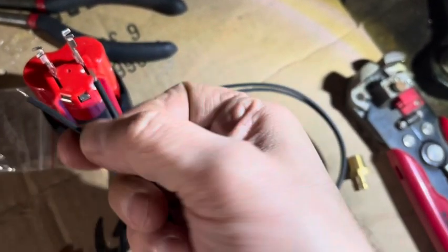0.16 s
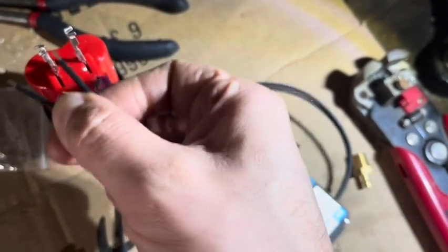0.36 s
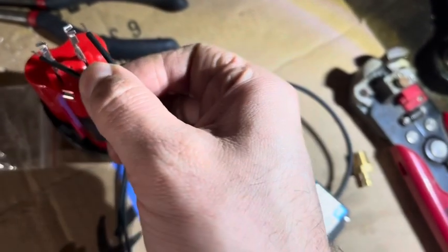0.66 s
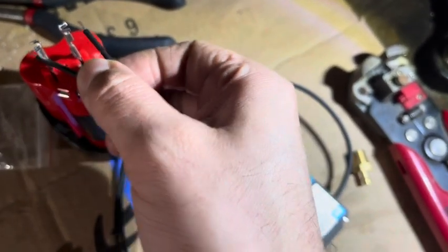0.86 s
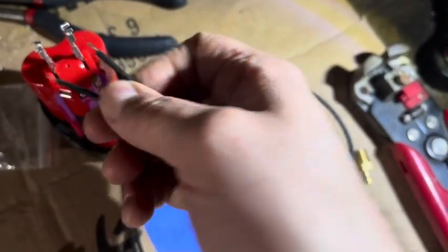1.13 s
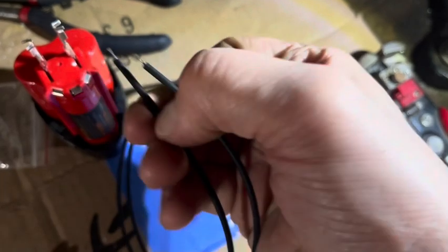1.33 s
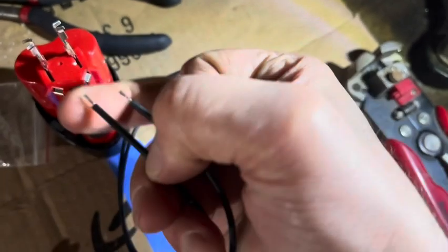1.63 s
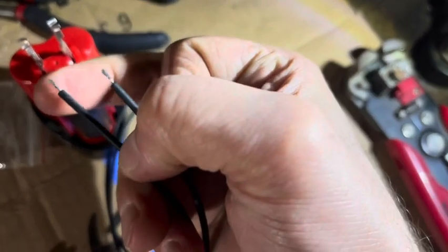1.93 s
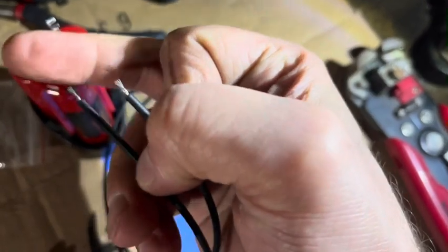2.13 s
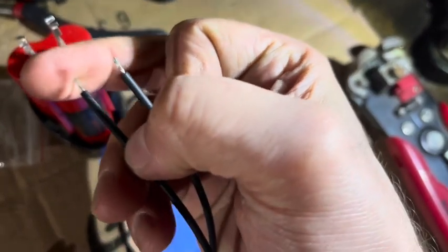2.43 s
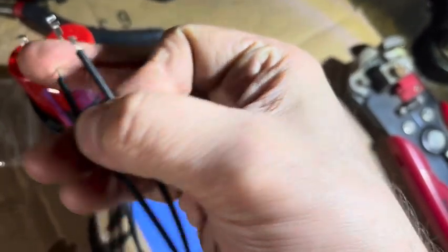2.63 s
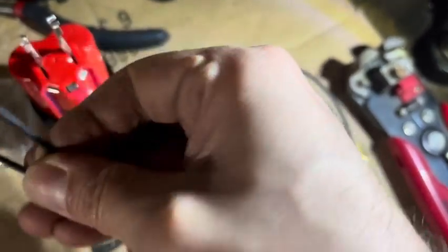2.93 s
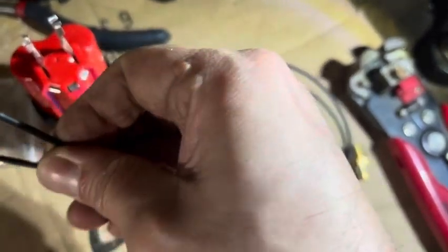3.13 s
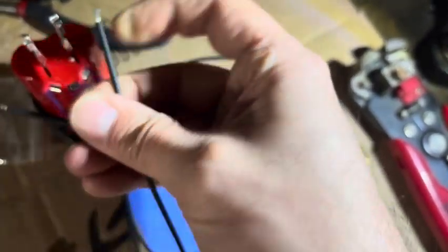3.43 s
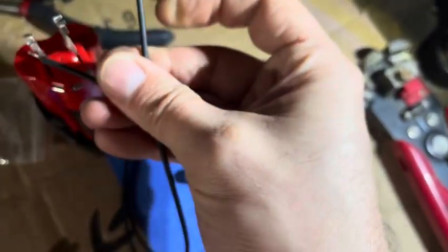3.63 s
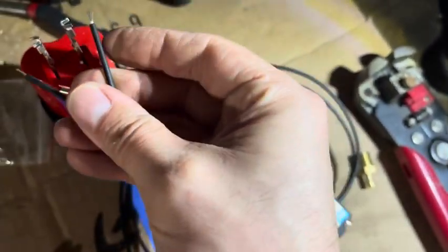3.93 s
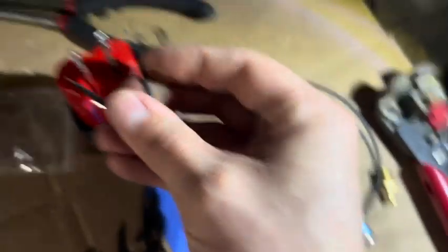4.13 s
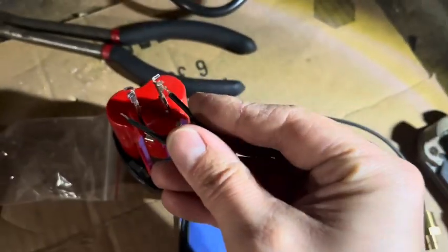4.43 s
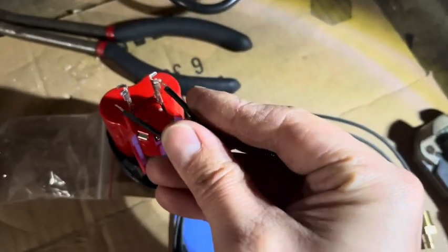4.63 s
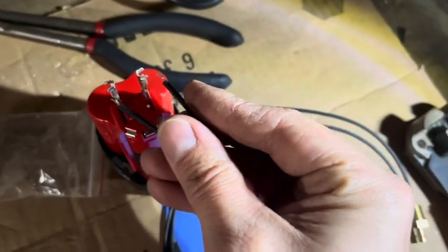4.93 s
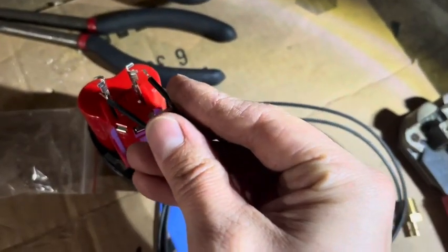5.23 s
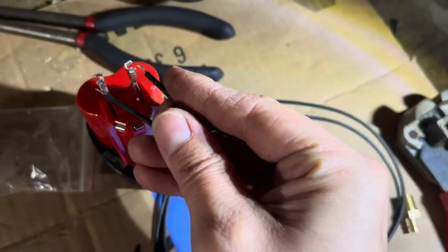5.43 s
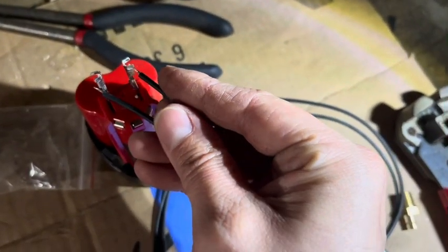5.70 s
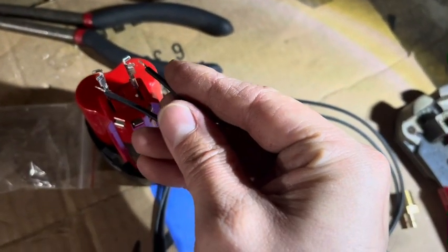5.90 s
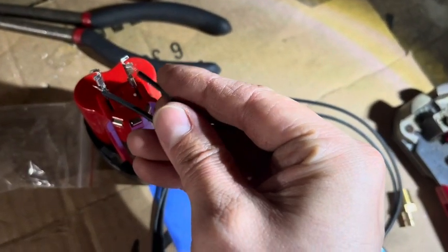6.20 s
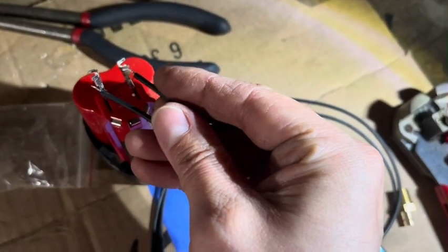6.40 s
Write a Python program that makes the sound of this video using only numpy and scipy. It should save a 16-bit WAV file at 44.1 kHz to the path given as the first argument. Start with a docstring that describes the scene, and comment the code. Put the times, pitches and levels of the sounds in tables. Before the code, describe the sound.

Close up in a small room, with a low wavering drone, dull rumble and faint hiss, fingers handle two stiff wires at a battery on a cardboard-covered bench. Hollow knocks, dry rubs, tiny flicks and a few thin metallic tinks come irregularly. After a quieter pause, a small solenoid valve clicks nine times, sharp and bright, the last seven close together, each with a short rattling wash.

```python
"""A low, wavering drone, a dull rumble and faint hiss fill a small room throughout.
First a hand works two stiff wires onto a battery's spade terminals over a cardboard-covered bench:
rubs and squeaks made of tiny slips, and knocks, flicks and tinks made of noise bursts, some with ringing.
Then the wires make and break contact and a small solenoid valve clicks nine times.
Each click is a cluster of plunger strokes that ring the valve, followed by a short rattling wash."""
import sys
import numpy as np
from scipy import signal
from scipy.fft import rfft, irfft
from scipy.io import wavfile
from scipy.ndimage import uniform_filter1d

SR = 44100
rng = np.random.default_rng(int(sys.argv[2]) if len(sys.argv) > 2 else 0)


def wrap_up_sound(samples):
    """Save the sound to the file named by the first command line argument, as 16-bit audio."""
    columns = np.atleast_2d(samples).T
    # keep every value between -1 and 1, then stretch to whole-number steps
    tamed = np.clip(columns, -1, 1)
    steps = np.round(tamed * 32767).astype(np.int16)
    wavfile.write(sys.argv[1], SR, steps)


N = 289296

# low drone: (time [s], level [dB])
DRONE_LEVEL = [(0.0, -36), (0.07, -56.5), (0.29, -41), (0.47, -39), (0.66, -68), (0.71, -47.5), (1.71, -54),
               (1.9, -42.5), (1.97, -53), (4.04, -58.5), (4.84, -50.5), (5.59, -63.5), (5.66, -52.5),
               (6.56, -51.5)]
# tone colour of the rumble, the hiss and the room's reflections: (frequency [Hz], level [dB])
RUMBLE_COLOUR = [(25, -22.5), (48, 1.5), (80, 2), (240, -12.5), (450, -27.5)]
AIR_COLOUR = [(250, -3.5), (1000, -15.5), (2900, -32), (3800, -27), (9300, -26.5), (12000, -31.5),
              (14000, -54)]
ROOM_COLOUR = [(200, 18), (1200, -0.5), (6000, 0), (9000, -0.5), (16000, -22)]

# rustle of the fingers: (time [s], level [dB])
RUSTLE_LEVEL = [(0.2, -75.5), (0.95, -75), (1.7, -85), (2.55, -84.5), (2.8, -77.5), (3.25, -87.5),
                (4.4, -77.5), (5.0, -87.5)]
# tone colour of fingers and wires shifting: (frequency [Hz], level [dB])
FIDGET_COLOUR = [(700, -2), (1500, 4), (2800, 5.5), (3800, -8.5), (9500, -5), (12500, -25.5)]
# wires dragging over cardboard and fingers:
# (start [s], end [s], scrape [dB], hiss [dB, plays 10 dB lower], favoured band [Hz])
RUBS = [(0, 0.112, -64, -59, 1520), (0.277, 0.358, -57.5, -60, 1410), (0.355, 0.367, -44, -61.5, 1200),
        (0.376, 0.443, -58, -51, 1400), (1.06, 1.135, -59.5, -63, 714), (1.108, 1.163, -48.5, -49.5, 1580),
        (1.161, 1.211, -48.5, -50.5, 1450), (1.489, 1.578, -76, -66, 2840), (2.861, 2.9, -62, -75, 1310),
        (2.977, 3.083, -71.5, -66, 2300), (3.38, 3.408, -66, -49, 2030), (3.487, 3.533, -56.5, -59.5, 1410),
        (3.613, 3.813, -67.5, -72.5, 1390)]
# tone colour of a scrape: (frequency [Hz], level [dB])
SCRAPE_COLOUR = [(250, -22.5), (480, 1), (700, -3.5), (1400, -1.5), (2200, -2.5), (3000, -2.5), (4500, -15)]
# fingers squeaking on insulation: (start [s], end [s], level [dB], first pitch [Hz], last pitch [Hz])
SQUEAKS = [(2.067, 2.174, -68.5, 2236, 1656), (2.403, 2.458, -76, 1724, 1830)]
# ringing pitches under a squeak: (frequency [Hz], level [dB])
SQUEAK_MODES = [(1850, 2.5), (2890, -1)]
# stiff wire flicking against fingers and terminals: (time [s], level [dB])
FLICKS = [(0.244, -63), (0.41, -51), (0.471, -62.5), (0.635, -61.5), (0.737, -65), (0.985, -59),
          (2.64, -62.5), (3.031, -57), (3.812, -54), (4.097, -68), (4.107, -63.5), (4.37, -67)]

# bare wire touching a spade terminal: (time [s], level [dB])
TINKS = [(0.843, -56.5), (3.825, -47.5), (4.261, -65), (4.684, -54.5)]
# wire strands scratching along a terminal:
# (start [s], end [s], level [dB], terminal's ring over the scratch [dB], favoured band [Hz])
SCRATCHES = [(0.753, 0.91, -73, 11, 8660), (4.502, 4.547, -58, 2.5, 6460), (4.6, 4.634, -55, 5, 4230),
             (4.769, 4.832, -74.5, 3.5, 8650), (5.193, 5.226, -70.5, -2, 8750)]
# ringing pitches of a terminal: (frequency [Hz], level [dB])
SPADE_MODES = [(3000, 12), (4215, 3), (4330, 0), (5860, -6.5), (8670, -0.5), (8850, 9.5), (9450, -1),
               (11050, -3)]
# wires and battery knocking on the bench:
# (time [s], thud [dB], rap [dB], tick [dB], bounce size [0-1])
KNOCKS = [(0.29, -54, -44, -47.5, 0.2), (0.3721, -40, -30.5, -41, 0.4), (0.549, -59.5, -51, -64.5, 0),
          (1.065, -60.5, -57.5, -96, 0.2), (1.168, -51, -52.5, -63.5, 0.4), (2.674, -50.5, -48, -64, 0.66),
          (2.963, -55.5, -53, -61, 0.43), (2.977, -53, -54, -72, 0.05), (3.677, -65, -48, -82, 0.26),
          (3.801, -57, -55.5, -64, 0), (3.821, -79, -62.5, -43, 0), (4.129, -41, -56, -56.5, 0.06),
          (4.157, -53.5, -56, -50.5, 0), (4.26, -65.5, -48, -44, 0.13), (4.856, -63.5, -59, -71, 0.27),
          (5.244, -68.5, -54, -56.5, 0.14)]
# ringing pitches of the cardboard and battery case: (frequency [Hz], level [dB])
THUD_MODES = [(510, 2.5), (640, -0.5), (745, -1)]
RAP_MODES = [(1215, 2.7), (1465, 6), (2030, 1)]
# tone colour of the three parts of a knock: (frequency [Hz], level [dB])
THUD_COLOUR = [(180, -30.5), (400, -12), (650, 6.5), (900, 7.5), (1300, -4)]
RAP_COLOUR = [(700, -14.5), (1200, 1), (2200, -5), (3300, -9.5), (5000, -26)]
TICK_COLOUR = [(2100, -1.5), (7000, 3.5), (9500, 5.5), (11500, -6.5), (12500, -15.5), (14000, -32.5)]

# tone colour of the wash after a click: (frequency [Hz], level [dB])
RATTLE_COLOUR = [(500, -1), (2500, 0), (9500, 1), (13000, -17)]
# valve clicks: (time [s], plunger travel [s], lift-off ring [dB], lift-off clack [dB],
# end-stop clack [dB], rebound size [0-1])
CLICKS = [(5.6375, 0.0048, -45, -44.5, -37.5, 0.8), (5.81, 0.004, -37, -37, -34, 0.2),
          (6.061, 0.002, -31, -43, -45.5, 0.85), (6.113, 0.0039, -41, -42, -34, 0.01),
          (6.2023, 0.003, -31, -44.5, -36, 0.58), (6.2911, 0.0036, -25.5, -39, -35.5, 0.03),
          (6.3763, 0.0038, -36, -45.5, -34, 0.74), (6.4648, 0.004, -43.5, -37.5, -34, 0),
          (6.5444, 0.0035, -32, -45, -32, 0.6)]
# faint ticks between the clicks: (time [s], clack [dB])
SETTLES = [(5.673, -58), (5.745, -68.5), (6.091, -56.5)]
# ringing pitches of the valve body and its steel core: (frequency [Hz], level [dB])
BODY_MODES = [(940, -6), (1470, 1), (2030, -5.5), (3300, 0), (5150, 4), (5850, 11.5), (7490, 10)]
METAL_MODES = [(8600, -2), (9010, -5), (9550, -1), (10250, -3), (10850, 11), (11800, 7.5)]
# tone colour of the body's contact and the core's contact: (frequency [Hz], level [dB])
CLACK_COLOUR = [(150, 0), (350, -10), (700, -8.5), (1400, -2.5), (3000, 1.5), (7400, -0.5), (8600, -11.5)]
SNAP_COLOUR = [(6400, -20.5), (7300, -5.5), (8700, 0.5), (9600, 6), (10250, -3), (10900, -2.5),
               (11800, -16), (13000, -20), (16500, -30)]

TIME = np.arange(N) / SR  # seconds
HIT_TIME = TIME[:8192]
DRONE_HZ, AIR_DB = 59.7, -77
RUMBLE_DB, RUMBLE_SWING_DB = -58.5, 3
SLIPS_PER_S = 3000  # average number of tiny slips each second
CLUMP_DB, GRAIN_DB = 3, 3.0  # unevenness of the clumps and of the single grains in a drag
DRAG_SKEW = 0.66  # below 1 moves the strongest pressure ahead of the middle of a drag
FOCUS_DB = 4.5  # fall per octave away from a favoured band, over two octaves
SPADE_T60_S, BOUNCE_S = 0.044, 0.011
THUD_HZ, THUD_DB_PER_OCTAVE = 900, 25.5  # band of a thud at -30 dB; softer bumps sound lower
CRACK_SLOPE, CRACK_DB = 1.528, 17.5  # the first crack of a knock grows faster than its rap
RATTLE_DB, RATTLE_T60_S = -14, 0.27  # level relative to the end-stop clack
LIFT_SHARE = 0.55  # length of the lift-off snap relative to a full blow
STOP_RING_DB, RING_LAG_S = 5, 0.00037  # core's ring over the end-stop clack; delay of a full blow's ring
REBOUND_S, REBOUND_RING_DB, REBOUND_CLACK_DB = 0.0077, -41.5, -37  # levels at rebound size 1
TOP_HZ = 16400


def undb(db):
    """Turn decibels into a multiplier."""
    return 10 ** (np.asarray(db) / 20)


def unit(x):
    """Scale to an average (rms) strength of 1."""
    return x / np.sqrt(np.mean(x ** 2))


def blow(x):
    """Scale a hit to the energy of 10 ms at rms 1."""
    return x * np.sqrt(SR / 100 / np.sum(x ** 2))


def held(x, length_s):
    """Scale a sound to the energy of rms 1 lasting length_s."""
    return x * np.sqrt(length_s * SR / np.sum(x ** 2))


def fade(t, t60):
    """Die away smoothly, 60 dB down after t60 seconds."""
    return np.exp(-np.log(1000) * t / t60)


def add(track, s, sound):
    """Mix a sound into a track at time s."""
    start = max(int(s * SR), 0)
    track[start:start + len(sound)] += sound[:N - start]


def wander(size):
    """Random drift of rms 1, smoothed over size samples and again over half of that."""
    smooth = uniform_filter1d(rng.standard_normal(N), size)
    return unit(uniform_filter1d(smooth, size // 2))


def colour(x, points):
    """Shape the tone through (Hz, dB) points with a filter that never sounds ahead of its input."""
    size = x.shape[-1]
    hz, db = np.transpose(points)
    bins = np.maximum(np.arange(size // 2 + 1) * SR / size, 1)
    # outside the points the level falls steeply for two octaves, then stays low
    beyond = np.abs(np.log2(bins / np.clip(bins, hz[0], hz[-1])))
    gain_db = np.interp(np.log(bins), np.log(hz), db) - 38.9 * np.minimum(beyond, 2)
    # folding the cepstrum (the spectrum of the log gain) forward in time fixes the phase
    cepstrum = irfft(np.log(undb(gain_db)), size)
    cepstrum[1:size // 2] *= 2
    cepstrum[size // 2 + 1:] = 0
    return irfft(rfft(x) * np.exp(rfft(cepstrum)), size)


def favour(x, centre_hz):
    """Stress one broad band, with less for each octave away from it."""
    octaves = np.arange(-2, 3)
    return colour(x, np.transpose([centre_hz * 2. ** octaves, -FOCUS_DB * np.abs(octaves)]))


def ring(modes, t60, detune):
    """An object's fading tones; each blow varies their pitch and balance, as if hitting another spot."""
    hz, db = np.transpose(modes)[:, :, None]
    pitch, size, phase = rng.standard_normal((3, len(modes), 1))
    waves = np.sin(2 * np.pi * (hz * (1 + detune * pitch) * HIT_TIME + phase))
    mix = np.sum(undb(db + 1.9 * size) * waves, axis=0)
    return blow(mix * fade(HIT_TIME, t60))


def excite(x, modes, t60):
    """The ringing of an object driven by x, at rms 1."""
    return unit(signal.fftconvolve(x, ring(modes, t60, detune=0.0039))[:len(x)])


def strike(spectrum, contact_t60, rise_s, modes=None, ring_t60=0, ring_db=0, detune=0.0039):
    """A brief rough contact and, if modes are given, the ringing that it leaves."""
    noise = rng.standard_normal(len(HIT_TIME)) * fade(HIT_TIME, contact_t60)
    crack = blow(colour(noise, spectrum))
    tone = undb(ring_db) * ring(modes, ring_t60, detune) if modes else 0
    onset = 1 - np.exp(-(HIT_TIME / rise_s) ** 2)
    return blow((crack + tone) * onset)


def swell(track, s, db, spectrum, length_s):
    """A soft noise that swells up to time s, then dies down."""
    shape = np.exp(-((HIT_TIME - length_s) / (length_s / 2)) ** 2)
    noise = rng.standard_normal(len(HIT_TIME)) * shape
    add(track, s - length_s, undb(db) * blow(colour(noise, spectrum)))


def drag(length_s, slips_per_s=SLIPS_PER_S):
    """Stick and slip: fine uneven grains that come in clumps under an arch of pressure."""
    t = TIME[:20000]
    progress = np.clip(t / length_s, 0, 1)
    arch = np.sqrt(np.sin(np.pi * progress ** DRAG_SKEW).clip(0))
    clumps = unit(uniform_filter1d(rng.standard_normal(len(t)), size=400))
    sizes = undb(CLUMP_DB * clumps + GRAIN_DB * rng.exponential(size=len(t)).clip(0, 4))
    slips = rng.random(len(t)) < slips_per_s / SR
    return arch * sizes * slips * np.sign(rng.standard_normal(len(t)))


def place(x, left_db, lag_s):
    """Two microphone ports: the left one hears the sound louder by left_db and later by lag_s."""
    hz = np.arange(N // 2 + 1) * SR / N
    late = irfft(rfft(x) * np.exp(-2j * np.pi * hz * lag_s), N)
    gain = undb(left_db)
    return np.array([gain * late, x]) * np.sqrt(2 / (1 + gain ** 2))


def room(x, wet_db, t60, build_s):
    """Dense reflections from bench and walls: fading noise, different at each port."""
    t = TIME[:20000]
    noise = colour(rng.standard_normal((2, len(t))), ROOM_COLOUR)
    tail = noise * fade(t, t60) * (1 - np.exp(-t / build_s))
    tail /= np.sqrt(np.sum(tail ** 2, axis=1, keepdims=True))
    return x + undb(wet_db) * signal.fftconvolve(x, tail, axes=1)[:, :N]


def wide_noise(spectrum, side_db):
    """Coloured noise shared by both ports, plus a part that pushes them in opposite directions."""
    mid, side = unit(colour(rng.standard_normal((2, N)), spectrum))
    return mid + undb(side_db) * np.array([side, -side])


def background():
    """A low tone of wavering pitch and level, uneven handling rumble (low noise) and faint even hiss."""
    turns = np.cumsum(DRONE_HZ + 0.9 * wander(size=5000)) / SR
    drone_db = np.interp(TIME, *np.transpose(DRONE_LEVEL))
    drone = np.sqrt(2) * undb(drone_db) * np.sin(2 * np.pi * turns)  # a sine's peak is root 2 over its rms
    rumble_db = RUMBLE_DB + RUMBLE_SWING_DB * wander(size=3500)
    rumble = undb(rumble_db) * wide_noise(RUMBLE_COLOUR, side_db=-12.0)
    air = undb(AIR_DB) * wide_noise(AIR_COLOUR, side_db=-1.5)
    return place(drone, left_db=1.5, lag_s=0) + rumble + air


def fidget():
    """Fingers shift on the wire insulation: tiny slips make a soft rustle in irregular spurts."""
    spurts_db = 6.0 * np.tanh(wander(size=1800))
    grip_db = spurts_db + np.interp(TIME, *np.transpose(RUSTLE_LEVEL))
    grains = (rng.random(N) < SLIPS_PER_S / SR) * rng.standard_normal(N)
    return place(undb(grip_db) * unit(colour(grains, FIDGET_COLOUR)), left_db=6.5, lag_s=0)


def rubs():
    """Each drag rings the cardboard in the band that the grip favours, with a little dry hiss."""
    scrape, hiss = np.zeros((2, N))
    for start, end, scrape_db, hiss_db, centre_hz in RUBS:
        length_s = end - start
        grains = drag(length_s)
        ringing = excite(grains, THUD_MODES + RAP_MODES, t60=0.021)
        body = unit(colour(grains, SCRAPE_COLOUR)) + undb(-3) * ringing
        add(scrape, start, undb(scrape_db) * held(favour(body, centre_hz), length_s))
        dry_hiss = colour(drag(length_s), TICK_COLOUR)
        add(hiss, start, undb(hiss_db - 10) * held(dry_hiss, length_s))
    return place(scrape, left_db=6.5, lag_s=-0.000097) + place(hiss, left_db=3.5, lag_s=0)


def squeaks():
    """Skin judders over wire insulation: a rough gliding chirp over a resonant rasp."""
    out = np.zeros(N)
    for start, end, db, from_hz, to_hz in SQUEAKS:
        length_s = end - start
        rasp = excite(drag(length_s), SQUEAK_MODES, t60=0.031)
        progress = np.clip(TIME[:len(rasp)] / length_s, 0, 1)
        judder = 1 + 0.083 * wander(size=30)[:len(rasp)]
        hz = (from_hz + (to_hz - from_hz) * progress) * judder
        chirp = np.sin(np.pi * progress) * np.sin(2 * np.pi * np.cumsum(hz) / SR)
        add(out, start, undb(db) * held(unit(chirp) + rasp / 2, length_s))
    return place(out, left_db=6.0, lag_s=0)


def flicks():
    """A bent wire slips free with a small dry snap, a short burst of noise."""
    out = np.zeros(N)
    for s, db in FLICKS:
        add(out, s, undb(db) * strike(FIDGET_COLOUR, contact_t60=0.029, rise_s=0.00064))
    return place(out, left_db=7.0, lag_s=0)


def terminals():
    """A wire end taps a thin spade terminal or scratches along it, and sets it ringing."""
    out = np.zeros(N)
    for s, db in TINKS:
        tink = strike(TICK_COLOUR, contact_t60=0.029, rise_s=0.00015,
                      modes=SPADE_MODES, ring_t60=SPADE_T60_S, ring_db=-3.5)
        add(out, s, undb(db) * tink)
    for start, end, db, ring_db, centre_hz in SCRATCHES:
        grains = drag(end - start, slips_per_s=1100)
        scratch = unit(unit(colour(grains, TICK_COLOUR)) + unit(colour(grains, FIDGET_COLOUR)))
        metal = scratch + undb(ring_db) * excite(grains, SPADE_MODES, SPADE_T60_S)
        add(out, start, undb(db) * held(favour(metal, centre_hz), end - start))
    return place(out, left_db=5.5, lag_s=0)


def knocks():
    """Wires and battery bump the cardboard: soft noise swells into a crack, hollow thud, rap and tick."""
    wood, ticks = np.zeros((2, N))
    for s, thud_db, rap_db, tick_db, bounce in KNOCKS:
        swell(wood, s, rap_db - 9.5, RAP_COLOUR, length_s=0.012)
        impulse = 1. * (HIT_TIME == 0)
        add(wood, s, undb(CRACK_SLOPE * rap_db + CRACK_DB) * blow(colour(impulse, RAP_COLOUR)))
        swell(ticks, s, tick_db - 19.5, TICK_COLOUR, length_s=0.029)
        thud_hz = THUD_HZ * 2 ** ((thud_db + 30) / THUD_DB_PER_OCTAVE)
        # a bounce of size 0 is silent
        for at, size in [(s, 1), (s + BOUNCE_S, bounce)]:
            thud = strike(THUD_COLOUR, contact_t60=0.025, rise_s=0.0009,
                          modes=THUD_MODES, ring_t60=0.024, ring_db=1.5)
            rap = strike(RAP_COLOUR, contact_t60=0.027, rise_s=0.00031,
                         modes=RAP_MODES, ring_t60=0.035, ring_db=0.5)
            tick = strike(TICK_COLOUR, contact_t60=0.027, rise_s=0.00046)
            add(wood, at, size * undb(thud_db) * blow(favour(thud, thud_hz)))
            add(wood, at, size * undb(rap_db) * rap)
            add(ticks, at, size * undb(tick_db) * tick)
    return place(wood, left_db=6.5, lag_s=-0.000058) + place(ticks, left_db=5.0, lag_s=0)


def rattle():
    """Each click dies away in a dense, smooth wash of noise from the bench and the loose things on it."""
    out = np.zeros((2, N))
    for s, travel_s, _, _, stop_db, _ in CLICKS:
        for port in out:
            wash = rng.standard_normal(len(HIT_TIME)) * fade(HIT_TIME, RATTLE_T60_S)
            add(port, s + travel_s, undb(stop_db + RATTLE_DB) * blow(colour(wash, RATTLE_COLOUR)))
    return out


def strokes():
    """List the plunger's blows (time, ring dB, clack dB, length share): lift-off, stop, rebound, ticks."""
    for s, travel_s, ring_db, clack_db, stop_db, rebound in CLICKS:
        stop_s = s + travel_s
        yield s, ring_db, clack_db, LIFT_SHARE
        yield stop_s, stop_db + STOP_RING_DB, stop_db, 1
        if rebound > 0:
            size_db = 20 * np.log10(rebound)
            yield stop_s + REBOUND_S, REBOUND_RING_DB + size_db, REBOUND_CLACK_DB + size_db, 1
    for s, db in SETTLES:
        yield s, db + 5.0, db, 1


def valve():
    """Soft noise swells into each blow: the body clacks at once, the steel core rings just after."""
    body, metal = np.zeros((2, N))
    ring_t60, ring_db = 0.014, -6  # seconds; dB relative to the contact noise
    for s, metal_db, body_db, share in strokes():
        swell(metal, s, metal_db - 32.5, SNAP_COLOUR, length_s=0.013)
        swell(body, s, body_db - 15.5, CLACK_COLOUR, length_s=0.0052)
        clack = strike(CLACK_COLOUR, contact_t60=0.0094, rise_s=0.00032, modes=BODY_MODES,
                       ring_t60=ring_t60, ring_db=ring_db, detune=0.01)
        snap = strike(SNAP_COLOUR, contact_t60=share * 0.015, rise_s=0.00014, modes=METAL_MODES,
                      ring_t60=share * ring_t60, ring_db=ring_db, detune=0.048)
        add(body, s, undb(body_db) * clack)
        add(metal, s + share * RING_LAG_S, undb(metal_db) * snap)
    return place(body, left_db=3.0, lag_s=-0.000033) + place(metal, left_db=0.5, lag_s=0.000245)


def scene():
    """Handling and valve get the reflections of one small room; background and rattle are added as is."""
    t60 = 0.19  # seconds
    handling = fidget() + rubs() + squeaks() + flicks() + terminals() + knocks()
    hands = room(handling, wet_db=-12.5, t60=t60, build_s=0.0019)
    clicks = room(valve(), wet_db=-19, t60=t60, build_s=0.0022)
    return background() + hands + rattle() + clicks


def record(dry):
    """The recorder cuts the treble above TOP_HZ with a steep filter."""
    return signal.sosfilt(signal.ellip(8, .2, 70, TOP_HZ, fs=SR, output="sos"), dry)


dry = scene()
out = record(dry)
wrap_up_sound(out)
```